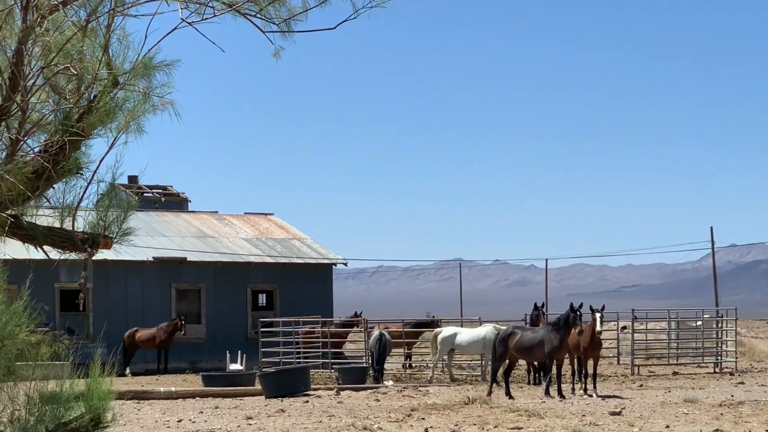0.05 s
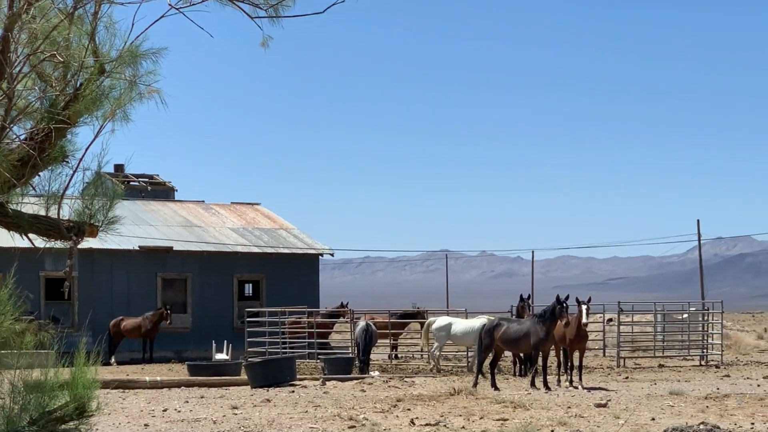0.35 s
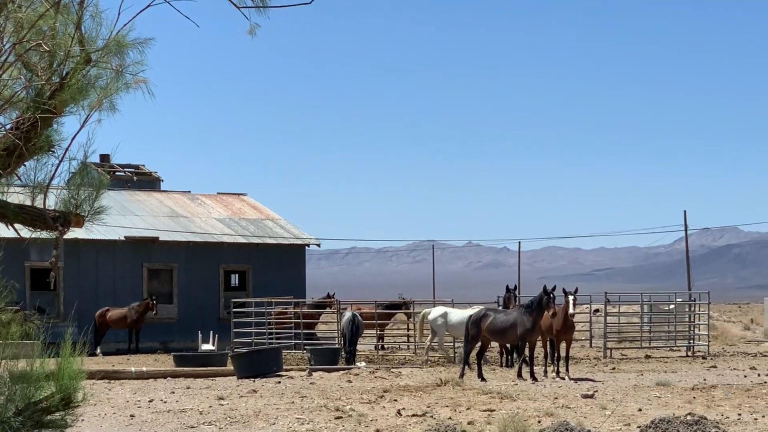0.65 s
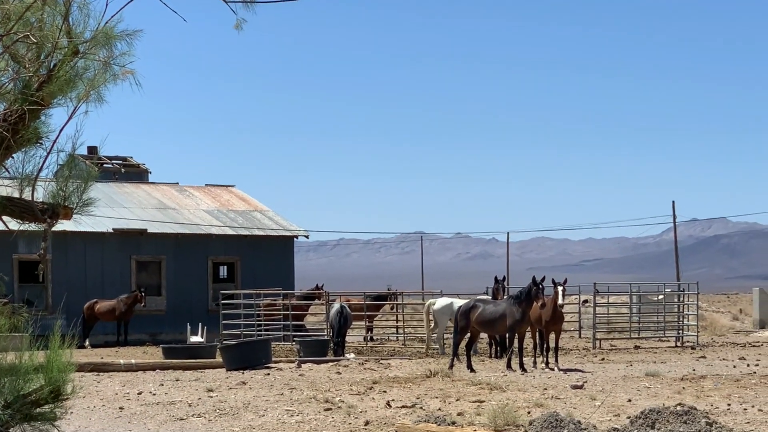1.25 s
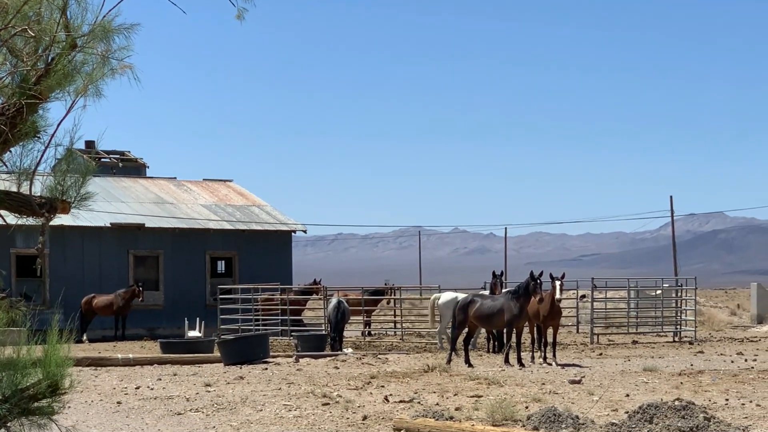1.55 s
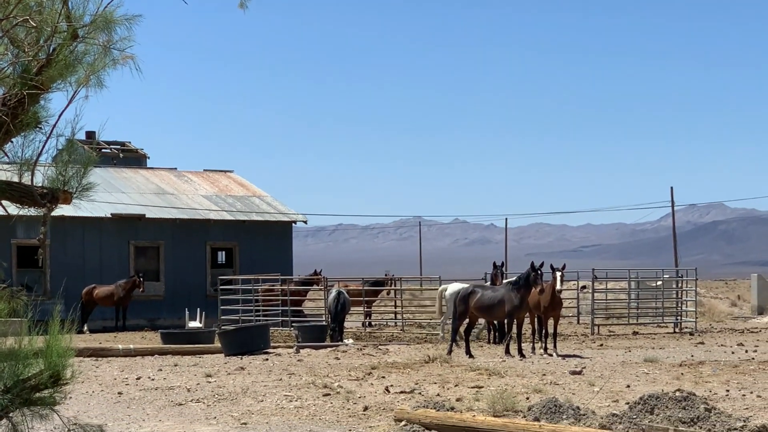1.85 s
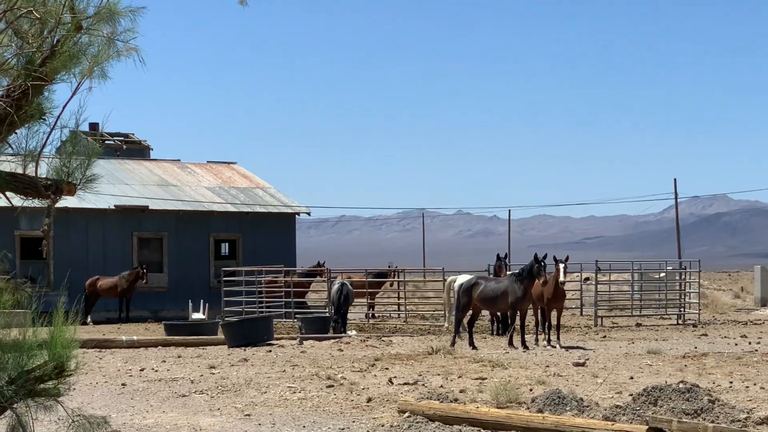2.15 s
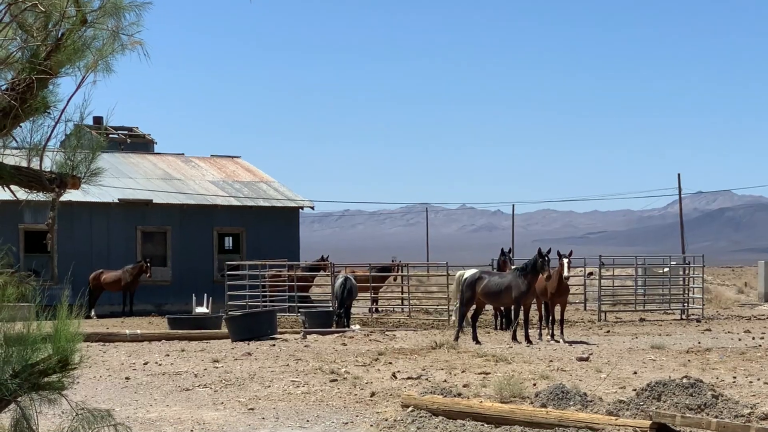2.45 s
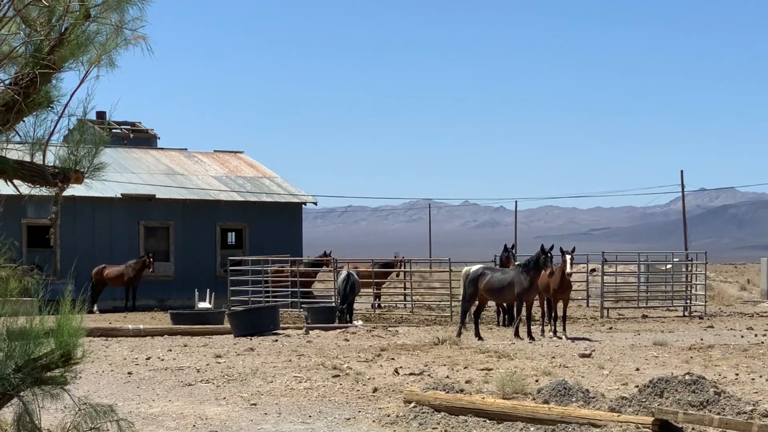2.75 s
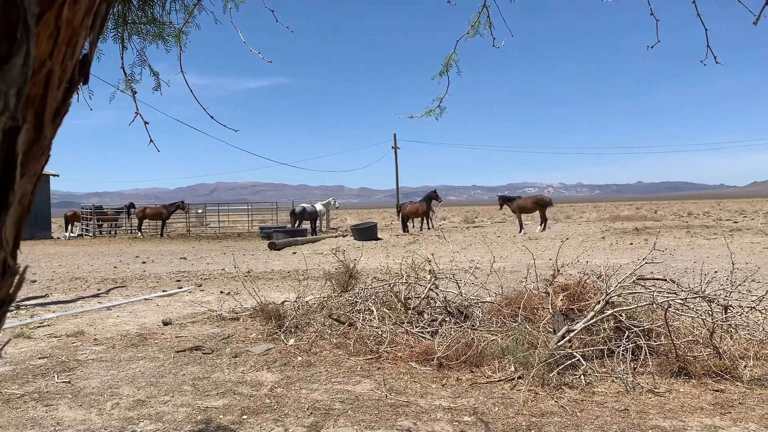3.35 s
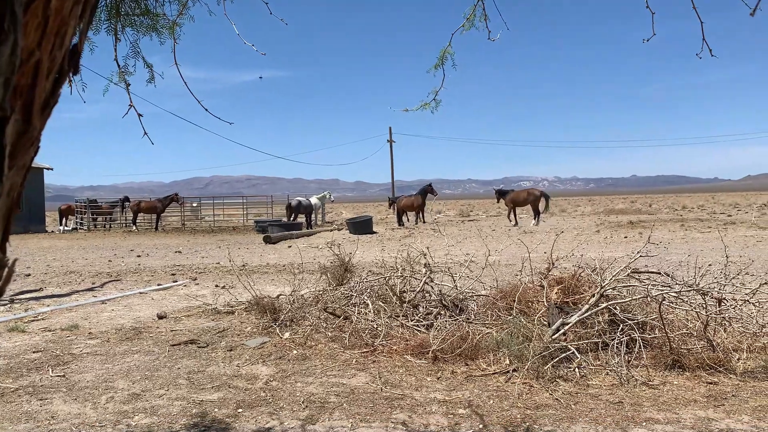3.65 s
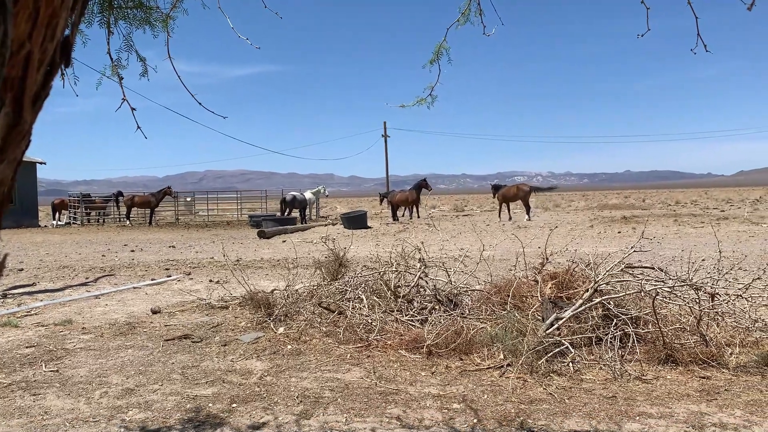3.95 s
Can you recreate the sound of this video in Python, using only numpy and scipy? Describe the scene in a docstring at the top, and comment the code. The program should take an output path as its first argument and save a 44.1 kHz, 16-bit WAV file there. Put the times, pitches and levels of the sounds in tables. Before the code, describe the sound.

Wind rumbles and thumps on the microphone in a desert yard. A brief snort-like blow comes early, then a few dry clicks and a faint far trill. After a cut, gusts continue with a soft hiss through dry brush.

```python
"""Wind rumbles and thumps on the microphone in a desert yard, and once breaks into a snort-like blow.
Between gusts come a few dry clicks, as of twigs and stones, and two far, trilling calls, probably of
a bird; both return dully from barn and ground. After three seconds the scene cuts, with a click, to a
more open spot, where the gusts go on and wind hisses steadily through dry brush."""
import sys
import numpy as np
from scipy import signal
from scipy.io import wavfile
from scipy.ndimage import uniform_filter1d

SR = 44100
rng = np.random.default_rng(int(sys.argv[2]) if len(sys.argv) > 2 else 0)


def transcribe(signal):
    """Save signal, clipped to [-1, 1], as a 16-bit WAV file at the path in sys.argv[1]."""
    frames = np.atleast_2d(signal).T
    limited = np.clip(frames, -1, 1)
    pcm = np.round(limited * 32767).astype(np.int16)
    wavfile.write(sys.argv[1], SR, pcm)


N = 176400
T = np.arange(N) / SR
CUT_S = 3.018  # from the yard to the open ground

# Stereo image of the wind in each place. Each row: frequency in Hz, left-right likeness from 0 to 1.
YARD_LIKENESS = [(180, .999), (380, .96), (560, .7), (950, .1)]
OPEN_LIKENESS = [(60, 0.67), (130, 0.23), (290, 0.2), (640, 0)]


def from_db(db):
    """Decibels to gain."""
    return 10 ** (np.asarray(db) / 20)


def rms_one(x):
    """Scale to rms 1."""
    return x / np.sqrt(np.mean(x ** 2) + 1e-20)


def in_time(rows):
    """An envelope drawn through (seconds, value) points."""
    return np.interp(T, *np.transpose(rows))


def at_hz(points, hz):
    """Read a spectrum on a log-frequency axis."""
    freqs, values = np.transpose(points)
    return np.interp(np.log(hz), np.log(freqs), values)


def butter(x, hz, kind, order=2):
    """Causal Butterworth filter."""
    sections = signal.butter(order, np.clip(hz, 10, .45 * SR), kind, fs=SR, output="sos")
    return signal.sosfilt(sections, x + 1e-18)


def resonate(x, hz, width_hz):
    """A resonance applied twice, for steep skirts."""
    r = np.exp(-np.pi * width_hz / SR)
    section = [(1 - r * r) / 2, 0, (r * r - 1) / 2, 1, -2 * r * np.cos(2 * np.pi * hz / SR), r * r]
    return signal.sosfilt([section, section], x + 1e-18)


def waver(hz):
    """A smooth random wobble of rms 1."""
    return rms_one(butter(rng.standard_normal(N), hz, "low"))


def dying_noise(start, decay_s):
    """A stereo noise burst that dies away."""
    return (T >= start) * np.exp(-np.abs(T - start) / decay_s) * rng.standard_normal((2, N))


def air_noise(spectrum, likeness, tilt_db=0, pivot_hz=100):
    """Stereo noise in third-octave bands; above the pivot it tilts by tilt_db per octave."""
    edges = 20 * 2 ** (np.arange(30) / 3)
    white = rng.standard_normal((2, 2, N + SR // 4))
    out, power = np.zeros((2, N)), 0
    for k, (low, high) in enumerate(zip(edges, edges[1:])):
        hz = np.sqrt(low * high)
        if spectrum[0][0] / 2 < hz and low < spectrum[-1][0]:
            mid, side = butter(white[k % 2], [low, high], "band", order=3)[:, -N:]
            alike = np.clip(at_hz(likeness, hz), -1, 1)
            gain = from_db(at_hz(spectrum, hz))
            tilt = from_db(tilt_db * max(np.log2(hz / pivot_hz), 0))
            out += gain * tilt * (np.sqrt(1 + alike) * mid + np.sqrt(1 - alike) * side * [[1], [-1]])
            power += gain ** 2 * (high - low) * 4 / SR
    return out / np.sqrt(power)


def still_air():
    """The faint, low bed of air in the yard."""
    # Tone of the air. Each row: frequency in Hz, level in dB per Hz.
    colour = [(30, -4), (65, 6.5), (160, -25), (260, -21.5), (650, -37.5), (920, -31.5), (1500, -41.5),
              (3000, -49.5), (6500, -55), (9500, -49.5), (12000, -63), (15000, -49.5)]
    return from_db(-44.5) * air_noise(colour, YARD_LIKENESS)


def brush():
    """Wind hisses through dry brush, with a flickering treble and faint whistles."""
    # Tone of the hiss. Each row: frequency in Hz, level in dB per Hz.
    colour = [(60, -1), (260, -3), (480, -1.5), (640, -4.5), (900, -8), (1400, -9.5), (1900, -18),
              (2300, -14), (3500, -25), (4700, -23.5), (5600, -32), (7000, -40.5), (10000, -42.5),
              (12000, -63), (14500, -47.5)]
    # Envelopes of the hiss and of its treble. Each row: time in seconds, relative level in dB.
    hiss_level = [(3.02, -48), (3.6, -48), (3.9, -47)]
    treble_level = [(3.08, 1), (3.16, 3), (3.2, -3), (3.64, -3.5), (3.69, 2), (3.86, 2), (3.97, -1)]
    # Whistles. Each row: centre and half length in seconds, pitch and width in Hz, level in dB.
    whistles = [(3.45, .4, 2195, 70, -64), (3.87, .07, 1380, 300, -48)]
    hiss = from_db(in_time(hiss_level) + 7.5) * air_noise(colour, OPEN_LIKENESS)
    treble = butter(hiss, (3500, 7000), "band", order=1)
    treble_db = in_time(treble_level) + 1.5 * waver(hz=60)
    out = hiss + (from_db(treble_db) - 1) * treble
    for centre, half, hz, width, db in whistles:
        swell = from_db(db) * np.exp(-.5 * ((T - centre) / half) ** 2)
        out += swell * rms_one(resonate(rng.standard_normal((2, N)), hz, width))
    return out


def echoes(x):
    """A thin, dull scatter of returns from barn and ground."""
    t60_s, top_hz = .34, 2500
    t = T[:SR // 2]
    tail = butter(rng.standard_normal((2, len(t))), top_hz, "low") * from_db(-60 * t / t60_s)
    tail /= np.sqrt(np.sum(tail ** 2) * SR / (4 * top_hz))
    return from_db(-15) * signal.fftconvolve(x, tail, axes=1)[:, :N]


def ticks():
    """Tiny bright cracks in dry brush."""
    # Each row: start in seconds, relative level in dB.
    cracks = [(0.398, -50.5), (2.8175, -79), (2.935, -62), (2.946, -66), (3.124, -44)]
    bursts = sum(from_db(db) * dying_noise(start, decay_s=.0024) for start, db in cracks)
    return 3 * butter(resonate(bursts, hz=5750, width_hz=3400), [4000, 8000], "band")


def clicks():
    """Heavily damped snaps with a woody body, as of twigs and stones, each with a short crumble."""
    # Each row: start in seconds, level in dB, pitch in Hz, crumble against the snap in dB.
    snaps = [(0.741, -54, 1530, 0.5), (1.111, -25.5, 1606, -21.5), (1.4705, -39, 1574, -12.5),
             (1.852, -58, 1050, 3.5), (1.923, -52, 1060, 7.5), (2.817, -62, 1430, -17),
             (2.894, -58, 1460, -4), (2.935, -42.5, 1650, -14)]
    out = np.zeros((2, N))
    for start, db, hz, crumble_db in snaps:
        impulse = np.arange(N) == int(start * SR)
        drive = np.vstack([impulse, dying_noise(start, decay_s=.009)])
        body = from_db(-6) * resonate(drive, hz=750, width_hz=800)
        ring = resonate(drive, hz, width_hz=.75 * hz) - body
        snap = ring[0]
        crumble = from_db(crumble_db) * ring[1:] / np.sqrt(np.sum(snap ** 2))
        out += from_db(db) * (snap / np.abs(snap).max() + crumble)
    return butter(out, 2700, "low", order=4)


def far_calls():
    """Raspy, nasal trills that slow down; each beat arches in loudness and pitch."""
    # The trills. Each row: start, length and first beat's length in seconds, level in dB.
    trills = [(0.06, 0.06, 0.023, -47), (2.498, 0.11, 0.0134, -39.5)]
    # Tone of the voice. Each row: harmonic number, level in dB.
    harmonics = [(2, -12.5), (3, 0.5), (4, -16), (6, -15.5)]
    pitch_hz, pitch_arch, jitter, rasp = 425, .11, .05, .35
    beat_growth, sounding_share, right_lag_s = 1.13, .7, .00015
    stereo_phase = np.array([[0], [2 * np.pi * pitch_hz * right_lag_s]])
    out = np.zeros((2, N))
    for start, length, first_beat, db in trills:
        age = np.maximum(T - start, 0)
        beat = np.log1p(age * (beat_growth - 1) / first_beat) / np.log(beat_growth)
        arch = np.sin(np.pi * np.minimum(beat % 1 / sounding_share, 1))
        leak = .3 * (age / length) ** 2  # the beats run together towards the end
        gate = uniform_filter1d((leak + arch) * (T > start) * (age < length), size=110)
        swell_db = np.interp(age / length, [0, .68, 1], [-11.5, 0, -9.5])
        hz = pitch_hz * (1 + pitch_arch * arch + jitter * waver(pitch_hz / 2))
        phase = 2 * np.pi * np.cumsum(hz) / SR - stereo_phase
        voice = sum(from_db(level) * np.sin(k * phase) for k, level in harmonics)
        out += from_db(db + swell_db) * gate * voice * (1 + rasp * waver(pitch_hz / 2))
    return out


def blow():
    """A fluttering rush of air that swells in puffs, flaps a few times and stops."""
    # Envelope of the rush. Each row: time in seconds, relative level in dB.
    puffs = [(.225, -61.5), (.248, -33.5), (.298, -68.5), (.307, -34), (.322, -49), (.352, -37),
             (.376, -35), (.39, -25), (.46, -27.5), (.479, -28), (.493, -30), (.505, -31.5), (.55, -92)]
    # Sharp flaps of air. Each row: centre in seconds, level in dB, half length in seconds.
    flaps = [(.3815, -25, .0014), (.4095, -19, .0016), (.435, -27, .002), (.457, -16, .003)]
    # Tones of the rush and the flaps. Each row: frequency in Hz, level in dB per Hz.
    rush_colour = [(60, -4), (150, 3), (280, 1), (480, -4), (640, -17), (820, -9), (1250, -20), (1700, -37),
                   (4000, -88)]
    flap_colour = [(200, -10.5), (450, 14), (640, -12), (830, 14), (1300, -5.5), (1800, -27), (4000, -58)]
    flutter_hz, flutter_depth_db, full_db = 78, 4.5, -19.5
    db = in_time(puffs)
    start, end = puffs[0][0], puffs[-1][0]
    fade = np.interp(T, [start - .02, start, end, end + .02], [0, 1, 1, 0])
    turns = flutter_hz * (T - flaps[0][0]) + waver(flutter_hz) / 10  # an uneven pulse
    flutter_db = flutter_depth_db * (np.cos(2 * np.pi * turns) - .5)
    air = air_noise(rush_colour, YARD_LIKENESS, tilt_db=.93 * (db - full_db), pivot_hz=445)
    rush = fade * from_db(db + 6.5 + flutter_db) * air
    flapping = sum(from_db(level) * np.exp(-.5 * ((T - at) / half) ** 2) for at, level, half in flaps)
    return rush + flapping * air_noise(flap_colour, YARD_LIKENESS)


def thumps():
    """Each eddy is a rounded pressure bump that rings the microphone's bass cut."""
    # Each row: peak time in seconds, relative level in dB, rise in seconds.
    eddies = [(0.012, 2.5, 0.00098), (0.179, -12, 0.00074), (.254, -9, 0.00094), (0.307, -7, 0.00091),
              (0.354, -5.5, 0.00069), (.401, -4.5, 0.00082), (0.436, -4, 0.0012), (0.4961, 3.5, 0.0012),
              (0.946, -14.5, 0.00088), (1.127, -25.5, 0.00049), (2.302, -9.5, 0.0017),
              (2.966, -10.5, 0.0011), (3.203, -10, 0.00046), (3.344, -15, 0.0004), (3.378, -13, 0.00044),
              (3.431, -5, 0.00048), (3.727, -14, 0.00084), (3.765, -8.5, 0.0009)]
    port_lag_s = .0006 * np.array([[-.5], [.5]])  # in the open, an eddy reaches the two ports apart
    out = np.zeros((2, N))
    for peak, db, rise in eddies:
        age = T - peak - port_lag_s * (peak > CUT_S)
        width = np.where(age < 0, rise, 1.17 * rise)
        out += from_db(db - 4) * np.exp(-.5 * (age / width) ** 2)
    return butter(out, 55.5, "high", order=4)


def rumble(likeness):
    """Turbulence at the microphone: a stronger wind is louder and brighter."""
    # Tone of a moderate wind. Each row: frequency in Hz, level in dB per Hz.
    colour = [(22, -27), (35, -12.5), (58, 5.5), (100, -4), (160, -12), (250, -26), (400, -40.5),
              (700, -62.5), (1200, -78.5)]
    # The breeze between gusts. Each row: time in seconds, relative level in dB.
    breeze = [(0, -26), (.13, -30.5), (.38, -31), (.52, -21.5), (.56, -44), (1.4, -37), (1.62, -38),
              (1.79, -57), (2.05, -49.5), (2.1, -38), (2.58, -38), (2.8, -52), (3.05, -32), (3.32, -35.5),
              (3.6, -33.5), (4, -28.5)]
    # Brief gusts on top. Each row: centre and half length in seconds, relative level in dB.
    gusts = [(0.053, 0.0038, -15), (0.167, 0.0077, -33.5), (0.258, 0.017, -20.5), (0.361, 0.016, -15.5),
             (0.614, 0.016, -30), (0.738, 0.038, -31), (0.855, 0.014, -29.5), (0.924, 0.0091, -24.5),
             (1.019, 0.029, -27), (1.166, 0.02, -23.5), (1.25, 0.031, -29.5), (1.348, 0.0092, -25.5),
             (1.479, 0.019, -27.5), (1.54, 0.014, -29), (2.25, 0.014, -39), (2.348, 0.0095, -30.5),
             (2.422, 0.011, -33.5), (2.62, 0.0022, -25.5), (2.674, 0.01, -35), (2.917, 0.036, -37),
             (3.142, 0.029, -21.5), (3.225, 0.017, -23.5), (3.405, 0.0094, -22.5), (3.508, 0.014, -20.5),
             (3.673, 0.02, -17), (3.79, 0.029, -21), (3.869, 0.009, -21)]
    moderate_db = -27
    gust_power = sum(from_db(db) ** 2 * np.exp(-((T - at) / half) ** 2) for at, half, db in gusts)
    wind_db = 10 * np.log10(from_db(in_time(breeze)) ** 2 + gust_power)
    noise = air_noise(colour, likeness, tilt_db=.2 * (wind_db - moderate_db), pivot_hz=84)
    # Even out the noise so that breeze and gusts set its level.
    power = uniform_filter1d(uniform_filter1d(np.mean(noise ** 2, axis=0), size=800), size=800)
    return from_db(wind_db) * noise / np.sqrt(np.abs(power) + 1e-6)


def scene():
    """The sheltered yard, then, with a click, the open ground."""
    details = clicks() + far_calls()
    yard = from_db(3) * rumble(YARD_LIKENESS) + still_air() + blow() + details + echoes(details)
    open_ground = from_db(3.5) * rumble(OPEN_LIKENESS) + brush()
    cut_click = from_db(-27) * (np.arange(N) == int(CUT_S * SR))
    return np.where(T < CUT_S, yard, open_ground) + cut_click + thumps() + ticks()


def record(dry):
    """A steep low-pass takes off the highest treble."""
    return signal.sosfilt(signal.cheby2(12, 70, 16200, fs=SR, output="sos"), dry)


dry = scene()
out = record(dry)
transcribe(out)
```